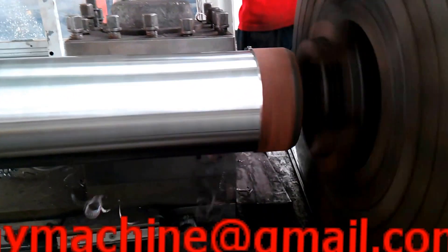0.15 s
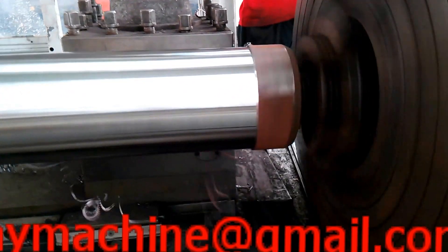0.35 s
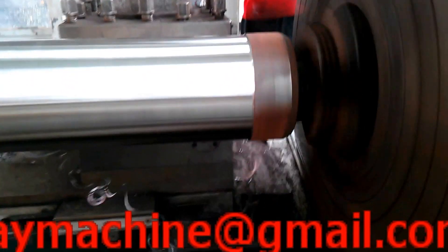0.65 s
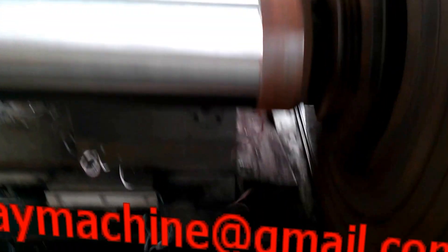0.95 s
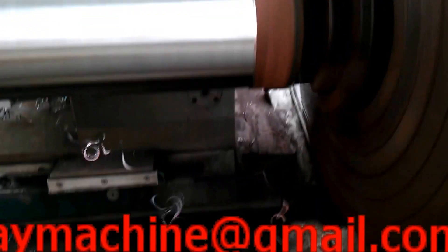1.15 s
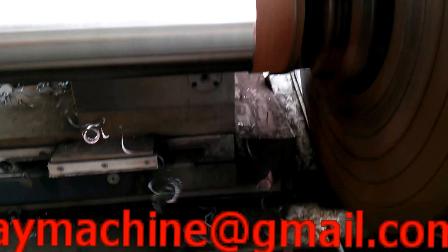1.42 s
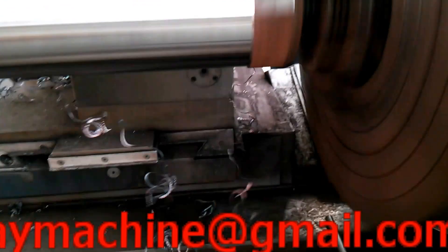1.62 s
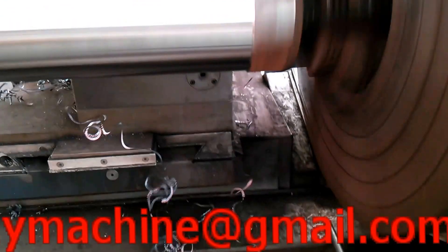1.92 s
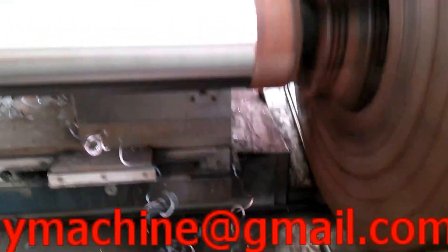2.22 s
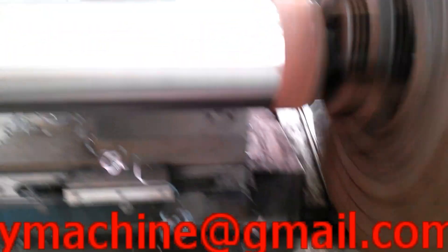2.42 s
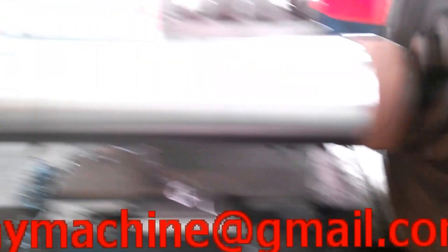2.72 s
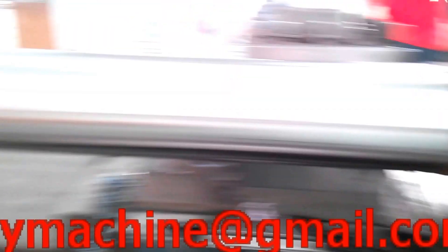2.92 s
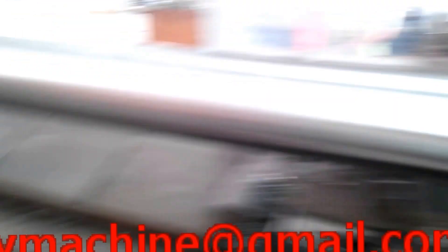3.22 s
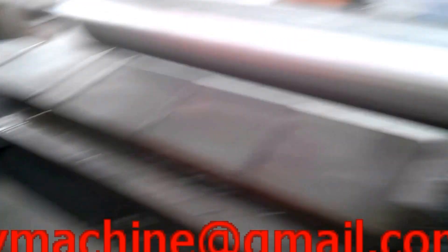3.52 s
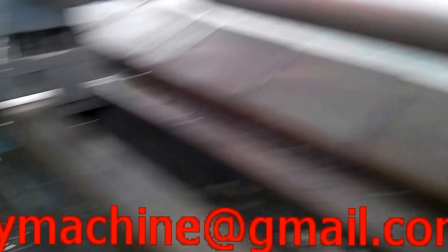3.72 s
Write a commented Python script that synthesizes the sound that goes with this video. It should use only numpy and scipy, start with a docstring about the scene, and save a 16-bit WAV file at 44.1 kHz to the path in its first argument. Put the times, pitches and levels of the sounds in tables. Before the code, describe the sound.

Close up in a workshop, a running metal lathe squeals very high and rough, its pitch swooping down and back rhythmically, with headstock rumble, gear hum, chip hiss, small snaps and thin whistles throughout.

```python
"""In a workshop, a large lathe cuts a steel roll close to a hand-held camera.
The tool squeals in a high band; three times a second a second squeal slides down, holds and climbs back.
Gears hum in narrow bands over headstock rumble; the cut scrapes, its chip hisses and snaps, thin whistles
sit on top. Squeals, hums and whistles are narrow noises, the rest is wide noise shaped by spectra or modes."""
import sys
import numpy as np
from scipy import signal
from scipy.fft import rfft, irfft, next_fast_len
from scipy.io import wavfile
from scipy.ndimage import uniform_filter1d, map_coordinates

SR = 44100
rng = np.random.default_rng(int(sys.argv[2]) if len(sys.argv) > 2 else 0)


def rack_gain(trim_db):
    """Turn a fader trim in dB into the linear factor to multiply a signal by."""
    fader = np.asarray(trim_db, float)
    return 10 ** (fader / 20)


def generate_wav(sig):
    """Save sig (samples, or channels by samples) to the path in sys.argv[1] as 16-bit PCM at SR."""
    pcm = np.round(np.clip(np.atleast_2d(sig).T, -1, 1) * 32767).astype(np.int16)
    wavfile.write(sys.argv[1], SR, pcm)


N = 170226
T = np.arange(N) / SR

# turns of the camera: [t/s, squeal left over right/dB, headstock lean to the left before scaling,
# low gear hums relative level/dB]
CAMERA_TURNS = [(0.0, 8, -20, 15.5), (0.02, 11, 3, -2.5), (1.62, 4, 3.5, -5.5), (3.62, 8.5, -2, 3.5),
                (3.86, 23, -14, -8)]
# spectrum of the chip's hiss: [f/Hz, relative level per Hz/dB]
CHIP_HISS = [(2200, -18), (3500, -5.5), (5500, 4.5), (7100, 0.5), (9000, 0.5), (11000, -4), (12800, 6),
             (13600, -5), (15600, -14)]
# modes of the curling chip: [f/Hz, width/Hz, relative level/dB]
CHIP_MODES = [(5590, 220, 0), (6050, 120, -2), (6440, 220, -1), (7120, 170, -1), (7600, 130, -4)]


def unit(x):
    """Scales to rms 1."""
    return x / np.sqrt(np.mean(np.abs(x) ** 2) + 1e-20)


def along(points, hz):
    """Reads (Hz, value) points on a log frequency axis."""
    f, v = np.transpose(points)
    return np.interp(np.log(hz + 1), np.log(f + 1), v)


def curves(rows):
    """One value per sample for each column after the time."""
    s, *cols = np.transpose(rows)
    return [np.interp(T, s, c) for c in cols]


def wobble(rate):
    """A smooth random curve with rate knots a second."""
    knots = rng.standard_normal(400)
    return map_coordinates(knots, [np.minimum(T * rate, 399)])


def filtered(x, response):
    """Multiplies the spectrum of x by a response of frequency."""
    m = next_fast_len(N + 8192)
    return irfft(rfft(x, m) * response(np.fft.rfftfreq(m, 1 / SR)), m)[..., :N]


def rush(response, patchy_db):
    """Two unrelated coloured noises of rms 1 that share patches of random gain in time and frequency."""
    z = signal.stft(rng.standard_normal((2, N)), nperseg=512)[2]
    field = rng.standard_normal(z.shape[1:])
    field = uniform_filter1d(field, size=5, axis=0)
    field = uniform_filter1d(field, size=10, axis=1)
    patched = signal.istft(z * rack_gain(patchy_db * unit(field)), nperseg=512)[1][:, :N]
    return unit(filtered(patched, response))


def spectrum(points):
    """Response drawn through (Hz, dB) points."""
    return lambda f: rack_gain(along(points, f))


def ringing(peaks):
    """Response of a set of resonances (Hz, full width at -6 dB in Hz, dB)."""
    def response(f):
        power = sum(rack_gain(db) ** 2 / (1 + (2 * (f - c) / w) ** 2) ** 2 for c, w, db in peaks)
        return np.sqrt(power)
    return response


def narrow(hz, width_hz):
    """Two unrelated narrow noises around a fixed or moving pitch: slow noise modulates a carrier."""
    slow = filtered(rng.standard_normal((4, N)), lambda f: 1 / (1 + (f / width_hz) ** 2) ** 2)
    carrier = np.exp(2j * np.pi * np.cumsum(hz + 0 * T) / SR)
    return unit(np.real((slow[:2] + 1j * slow[2:]) * carrier))


def gate(middle, length, edge):
    """Near 1 inside the event, near 0 outside, with soft edges."""
    outside = np.abs(T - middle) - length / 2
    return 1 / (1 + np.exp(np.clip(outside / edge * 2, -40, 40)))


def placed(pair, pan_db):
    """Mixes two unrelated versions into what the two microphone ports pick up."""
    # likeness of the ports: [f/Hz, left-right likeness 0..1]
    alike = [(60, .95), (130, .95), (290, .9), (640, .8), (1400, .3), (2600, .2), (5000, .05), (9000, .6),
             (13000, .4)]
    # phase between the ports: [f/Hz, lead of the left/rad]
    lead = [(100, 0), (860, .4), (2000, 1.2), (9000, 1.5)]
    # balance of the ports before panning: [f/Hz, left over right/dB]
    tilt = [(30, -.7), (125, 1.5), (300, -1.3), (700, 1), (2500, 1.5), (5000, -1.1), (9000, 0)]

    def like(f):
        return np.clip(along(alike, f), 0, 1)

    def port(f, side):
        return rack_gain(side * along(tilt, f) / 2) * np.exp(.5j * side * along(lead, f))

    left = filtered(pair[0], lambda f: port(f, 1))
    # the right shares the first version as far as the ports are alike; the second fills the remainder
    right = filtered(pair, lambda f: port(f, -1) * [like(f), np.sqrt(1 - like(f) ** 2)]).sum(0)
    return np.array([left * rack_gain(pan_db / 2), right * rack_gain(-pan_db / 2)])


def squeal():
    """The steady squeal: a rough core in a stronger, wider skirt, with lines inside and a thin tone above."""
    # steady squeal: [t/s, level before the holder/dB, centre f/Hz]
    path = [(0.0, -32, 11480), (0.09, -59, 11740), (0.2, -30, 11550), (1.83, -28.5, 12090),
            (1.98, -48, 12050), (1.99, -44, 11860), (2.11, -49, 12000), (2.22, -31, 11620),
            (2.54, -26, 11470), (2.6, -34.5, 11640), (3.02, -25, 11750), (3.19, -34, 11700),
            (3.2, -23.5, 11640), (3.53, -41.5, 11330), (3.6, -57, 11500), (3.64, -37, 11800),
            (3.79, -58, 11300), (3.86, -37, 11400)]
    # thin lines that come and go: [f/Hz, width/Hz, relative level/dB]
    thin_lines = [(11650, 110, -5), (11340, 60, 2.5), (11540, 66, 2), (11850, 40, -4), (12150, 50, 4)]
    db, hz = curves(path)
    pan_db = curves(CAMERA_TURNS)[0]
    core = narrow(hz, width_hz=330)
    skirt = rack_gain(11) * narrow(hz, width_hz=1100)
    tone = unit(core + skirt)
    tone = unit(tone + rack_gain(-4) * rush(ringing(thin_lines), patchy_db=7.0))
    tone = tone + rack_gain(-11) * narrow(12618, width_hz=14)
    return placed(rack_gain(db + 0.81 * wobble(25.21)) * tone, pan_db)


def slides():
    """Flat-bottomed dips in pitch, thin at the bottom, blurred on the flanks, with scraping around them."""
    # sliding squeals: [middle t/s, length/s, lowest f before jitter/Hz, core level before flicker and holder/dB]
    dips = [(0.091, 0.26, 9340, -34.5), (0.426, 0.33, 8400, -37), (0.761, 0.27, 8660, -34),
            (1.103, 0.23, 8660, -33.5), (1.421, 0.27, 8870, -34.5), (1.747, 0.28, 8660, -36),
            (2.083, 0.17, 9400, -32), (2.396, 0.27, 8400, -36.5), (2.768, 0.28, 8500, -33.5),
            (3.102, 0.31, 8570, -37.5), (3.405, 0.28, 8750, -35.5), (3.731, 0.15, 9540, -35.5)]
    top_hz, steepness, edge_s = 11700, 3.5, .035
    hz, gain, flank = np.full(N, float(top_hz)), np.zeros(N), np.ones(N)
    for s, length, low_hz, db in dips:
        rise = np.minimum(np.abs(T - s) / (length / 2), 1) ** steepness  # 0 at the bottom, 1 at the top
        hz = np.minimum(hz, low_hz + (top_hz - low_hz) * rise)
        flank = np.minimum(flank, rise)
        gain = gain + rack_gain(db) * gate(s, length, edge_s)
    hz = hz + 150 * wobble(25)  # jitter in Hz
    blur = np.minimum(7 * flank, 1)
    thin = (1 - blur) * narrow(hz, width_hz=290)
    blurred = blur * rack_gain(-3) * narrow(hz, width_hz=1000)
    core = rack_gain(3 * wobble(45)) * (thin + blurred)  # flickers in level
    rasp = rack_gain(-1) * narrow(10050, width_hz=3300)  # broad scraping that comes with each slide
    return placed(gain * (core + rasp), pan_db=14)


def holder(squeals):
    """The modes of tool and holder colour every squeal."""
    # modes of tool and holder: [f/Hz, width/Hz, relative level/dB]
    modes = [(8450, 300, -2), (8800, 300, 0), (9600, 250, -1), (9940, 220, -1), (10600, 300, 0),
             (11400, 200, -1), (11620, 170, 1), (11860, 140, 3), (12080, 200, -1), (10300, 5000, -4)]
    return filtered(squeals, ringing(modes))


def headstock_rumble():
    """Wide low noise of the headstock, slightly patchy."""
    # headstock spectrum: [f/Hz, relative level per Hz/dB]
    points = [(150, -21.5), (200, -17.5), (240, -9.5), (500, -7), (750, -10), (950, -11), (1300, -26.5),
              (2200, -23)]
    return rack_gain(3) * rush(spectrum(points), patchy_db=2.5)


def gears(low_db):
    """Gear hums: noise through narrow resonances, the low ones with a level of their own."""
    # gear hums: [f/Hz, width/Hz, relative level/dB]
    hums = [(345, 9.7, 3.5), (373, 27, -8), (401.5, 4.4, -7), (503, 15.5, -4), (619.3, 4.2, 5),
            (689, 33, 0.5), (780.6, 21, -4), (833.6, 17, 2.5), (875.5, 21, -3), (1005.6, 12.7, -6.5),
            (1106, 9.4, -18), (1392, 16, -12.5), (1675, 21, -11)]
    # low gear hums: [f/Hz, width/Hz, relative level/dB]
    low_hums = [(233, 13, -3), (274, 16, 0)]
    upper = rack_gain(1) * rush(ringing(hums), patchy_db=2.5)
    return upper + rack_gain(low_db - 5.5) * rush(ringing(low_hums), patchy_db=1.0)


def mesh(mesh_db):
    """Gear mesh tone: a narrow noise that wanders in pitch and wavers in level."""
    wandering_hz = 667 + 4 * wobble(9)
    return rack_gain(mesh_db + 1.64 * wobble(15)) * narrow(wandering_hz, width_hz=30)


def machine():
    """The headstock: rumble and gear hums swell together, the mesh tone leans further to the side."""
    # headstock: [t/s, relative level of rumble and hums/dB, mesh tone level before wavering/dB]
    levels = [(0.0, -47.5, -64), (0.12, -39, -36), (0.28, -48, -54), (0.73, -41.5, -49.5),
              (0.87, -41.5, -32), (1.02, -44, -47), (1.05, -41, -37), (1.56, -42, -39), (2.2, -39, -34.5),
              (2.26, -46, -41.5), (2.89, -42.5, -40), (2.96, -50.5, -69), (3.03, -47, -35),
              (3.08, -40.5, -41), (3.22, -44.5, -76), (3.29, -45.5, -30), (3.33, -42, -46.5),
              (3.81, -40.5, -59), (3.86, -39, -34)]
    db, mesh_db = curves(levels)
    _, lean, low_db = curves(CAMERA_TURNS)
    body = rack_gain(db + 1.65 * wobble(17)) * (headstock_rumble() + gears(low_db))
    return placed(body, 0.052 * lean) + placed(mesh(mesh_db), 1.8 * lean)


def shop():
    """Low steady rumble of the far workshop and the hum of the motor shaft."""
    # shop spectrum: [f/Hz, relative level per Hz/dB]
    points = [(15, -6), (30, 3.5), (75, -26), (130, 4.5), (190, -9.5), (300, -8.5)]
    rumble = rack_gain(-48.5) * rush(spectrum(points), patchy_db=0.2)
    hum = rack_gain(-66) * narrow(46.7, width_hz=4.5)
    return placed(rumble + hum, pan_db=1.5)


def scrape():
    """The edge scrapes: patchy wide noise."""
    # scraping spectrum: [f/Hz, relative level per Hz/dB]
    points = [(600, -32), (1100, 0.5), (1600, -7.5), (2200, -3), (3200, -11.5)]
    return rush(spectrum(points), patchy_db=4.0)


def post():
    """Noise through the modes of the tool post, which swell and fade unevenly."""
    # modes of the tool post: [f/Hz, width/Hz, relative level/dB]
    modes = [(2483, 174, -1), (2638, 91, 3), (2800, 51, 4), (2845, 79, -4.5), (2840, 610, -8.5)]
    return rush(ringing(modes), patchy_db=1.8)


def chip():
    """The chip's wide hiss with noise through its modes over it."""
    hiss = rush(spectrum(CHIP_HISS), patchy_db=1.0)
    return unit(hiss + rack_gain(-3) * rush(ringing(CHIP_MODES), patchy_db=3.0))


def cut():
    """The edge scrapes, the tool post rings under the cut and the chip hisses and snaps."""
    # the cut: [t/s, scraping level/dB, post ring level before wavering/dB, chip hiss relative level/dB]
    levels = [(0.0, -37, -47, -48.5), (0.19, -38.5, -42.5, -41), (0.22, -43.5, -50, -48),
              (0.29, -49, -40, -45.5), (0.73, -45.5, -45, -45.5), (0.83, -39, -37.5, -42),
              (0.91, -57, -41.5, -43.5), (1.87, -42, -40.5, -42), (1.96, -47, -49.5, -47),
              (2.22, -48.5, -41.5, -44.5), (2.7, -44.5, -46, -44), (2.83, -42.5, -42, -39.5),
              (2.98, -66, -51.5, -51), (3.1, -49, -37.5, -37.5), (3.21, -49, -42.5, -44.5),
              (3.45, -48, -37, -39), (3.58, -51, -49, -48), (3.86, -40.5, -42.5, -44.5)]
    scrape_db, post_db, hiss_db = curves(levels)
    scraping = rack_gain(scrape_db) * scrape()
    ring = rack_gain(post_db + 1.2 * wobble(14)) * post()
    hiss = rack_gain(hiss_db + 5 + 1.5 * wobble(10.324)) * chip()
    return placed(scraping + ring + hiss + snaps(), pan_db=-0.5)


def whistles():
    """Thin lines that each waver on their own over a faint hiss; one off to the left has its own level."""
    # other whistles: [f/Hz, relative level/dB]
    thin_tones = [(13430, -9), (14336, -13), (14955, -14), (15086, -13), (15285, -7), (15462, -6),
                  (15623, -14)]
    # hiss around them: [f/Hz, width/Hz, relative level/dB]
    faint_hiss = [(14600, 300, -17), (14500, 1100, 7)]
    # levels: [t/s, left whistle level/dB, other whistles and hiss relative level/dB]
    levels = [(0.0, -45, -40), (0.19, -37.5, -49), (0.39, -55, -45), (0.88, -46, -39), (2.53, -52, -46),
              (2.64, -46, -32), (2.92, -59, -41), (3.86, -49, -46)]
    left_db, rest_db = curves(levels)
    lines = sum(rack_gain(db - 2 * wobble(2.16)) * narrow(hz, width_hz=13) for hz, db in thin_tones)
    hiss = rack_gain(-7.5) * rush(ringing(faint_hiss), patchy_db=-4)
    left_whistle = rack_gain(left_db) * narrow(14766, width_hz=16)
    return placed(rack_gain(rest_db) * (lines + hiss), pan_db=-2.5) + placed(left_whistle, pan_db=15)


def chatter():
    """Brief extra bands of narrow noise below the steady squeal."""
    # chatter: [middle t/s, length/s, centre f/Hz, level before the holder/dB]
    bursts = [(0.305, 0.13, 10660, -35), (0.406, 0.08, 10500, -33.5), (2.302, 0.26, 10790, -34),
              (2.713, 0.15, 10570, -38.5), (3.152, 0.15, 10050, -37.5)]
    bands = sum(rack_gain(db) * gate(s, length, edge=0.013) * narrow(hz, width_hz=770)
                for s, length, hz, db in bursts)
    return placed(bands, pan_db=19)


def snaps():
    """Each break of the chip is a sudden, fast-fading burst of noise in the colours of its hiss and modes."""
    # breaks of the chip: [t/s, relative peak level/dB]
    breaks = [(0.5862, -32), (0.9662, -26), (1.4391, -25), (1.511, -26.5), (1.7674, -22), (2.7685, -22),
              (3.0959, -30), (3.4027, -31), (3.8053, -32)]
    t60_s, trim_db = .09, -9
    burst = sum(rack_gain(db + trim_db - 60 * np.abs(T - s) / t60_s) * (T >= s) for s, db in breaks)
    modes = rush(ringing(CHIP_MODES), patchy_db=4)
    hiss = rush(lambda f: rack_gain(along(CHIP_HISS, f)) * (f < 9000), patchy_db=1)
    return burst * unit(modes + hiss)


def scene():
    """All parts of the lathe together; the squeals pass through the modes of the holder."""
    tool = holder(squeal() + slides() + chatter())
    return tool + machine() + shop() + cut() + whistles()


def roll_off(x):
    """The treble ends steeply here."""
    return signal.sosfilt(signal.butter(12, 16880, fs=SR, output="sos"), x)


def record(dry):
    """The microphone's treble dip and band limit."""
    top_hz, dip_hz, dip_width_hz, dip_db = 15750, 13750, 650, -9

    def mic(hz):
        dip = np.exp(-((hz - dip_hz) / dip_width_hz) ** 4)
        return (hz < top_hz) * rack_gain(dip_db * dip)

    return roll_off(filtered(dry, mic))


dry = scene()
out = record(dry)
generate_wav(out)
```